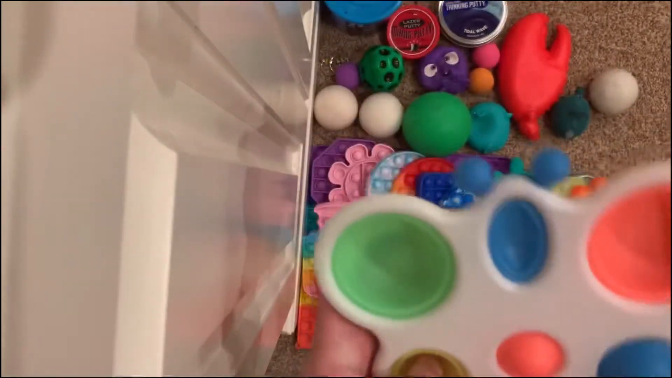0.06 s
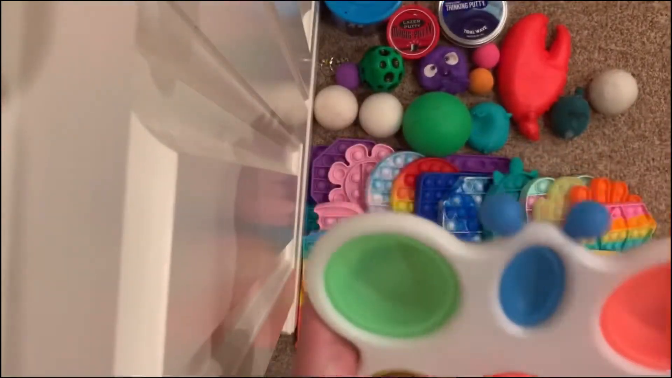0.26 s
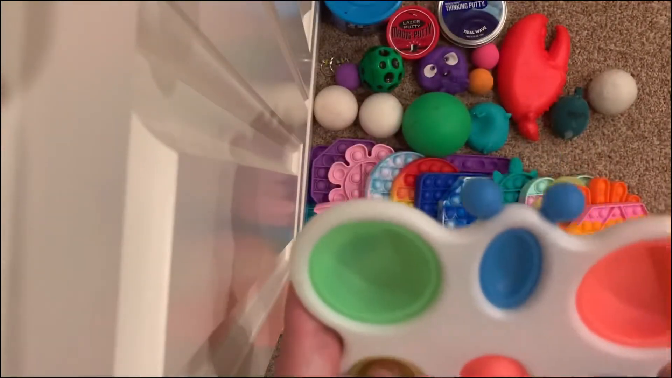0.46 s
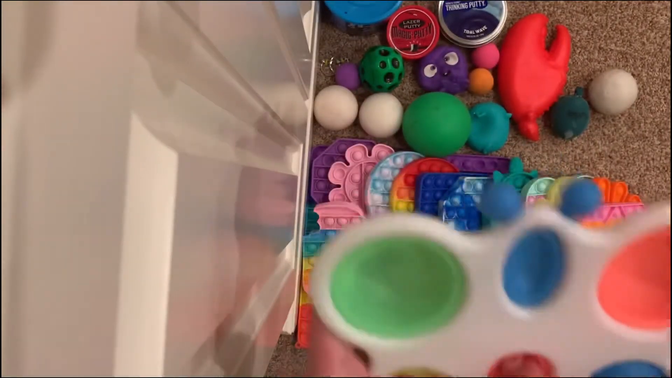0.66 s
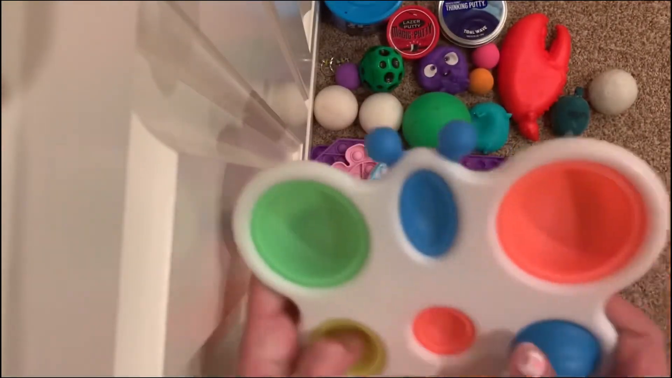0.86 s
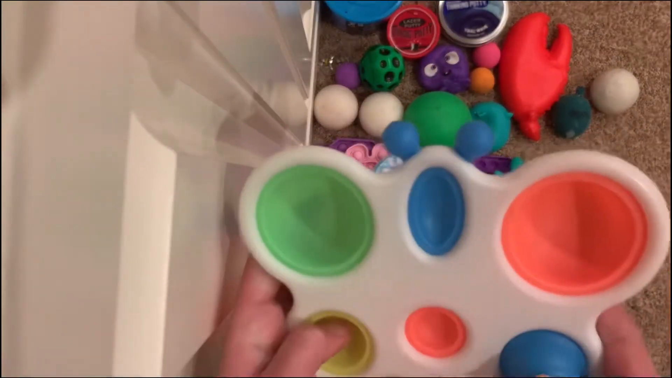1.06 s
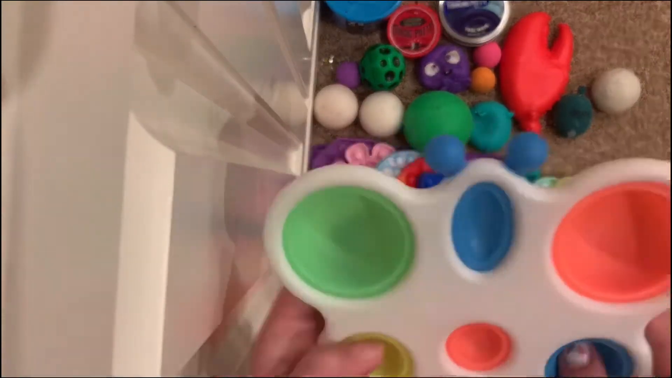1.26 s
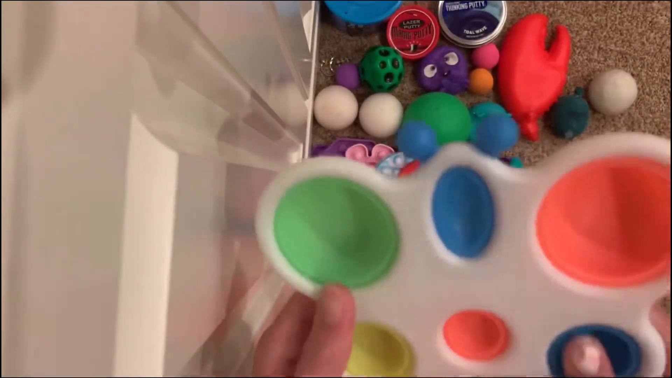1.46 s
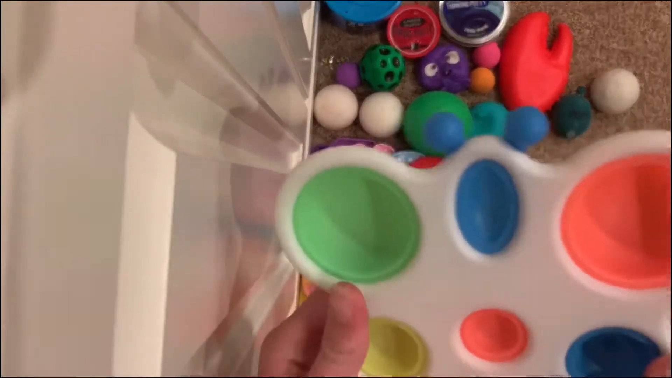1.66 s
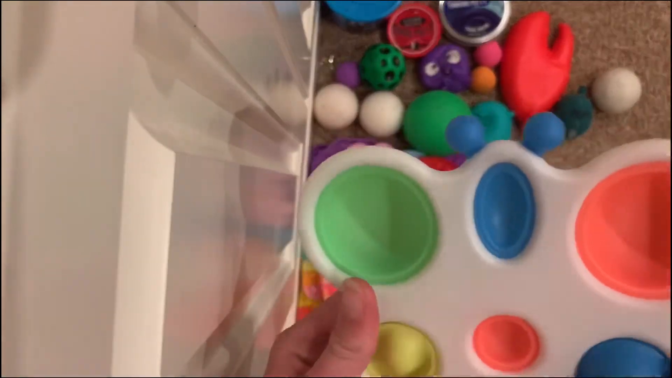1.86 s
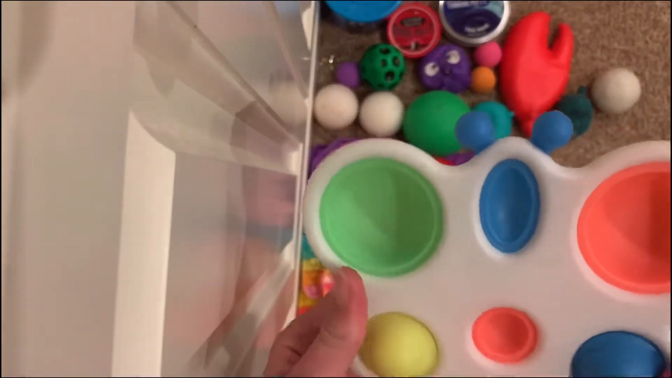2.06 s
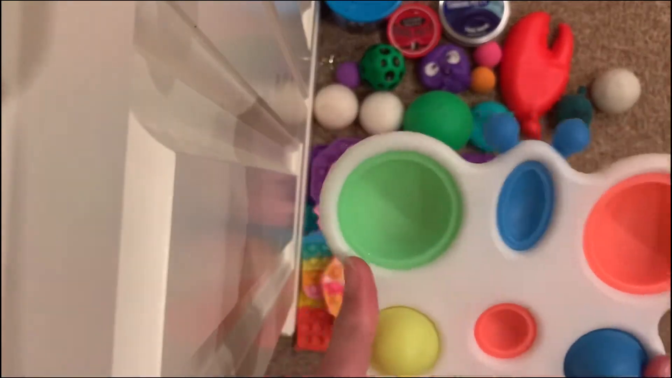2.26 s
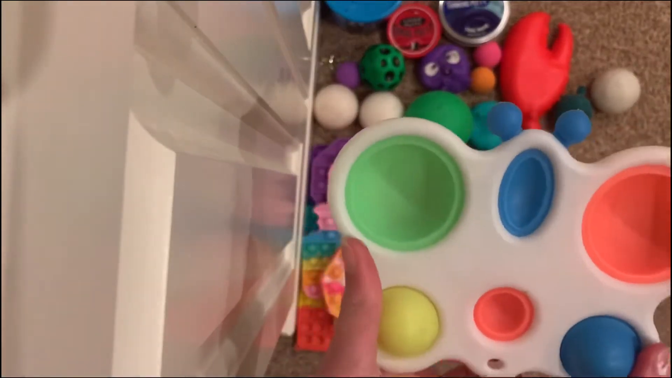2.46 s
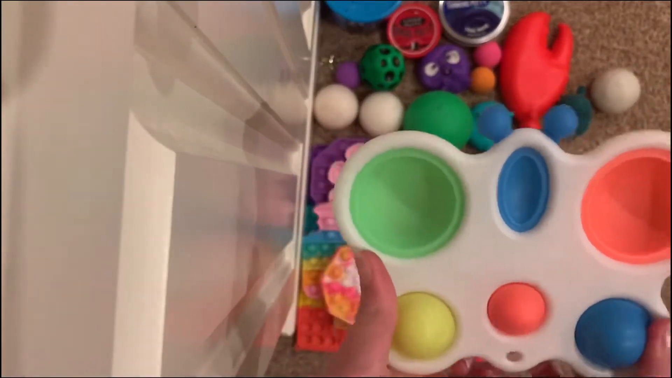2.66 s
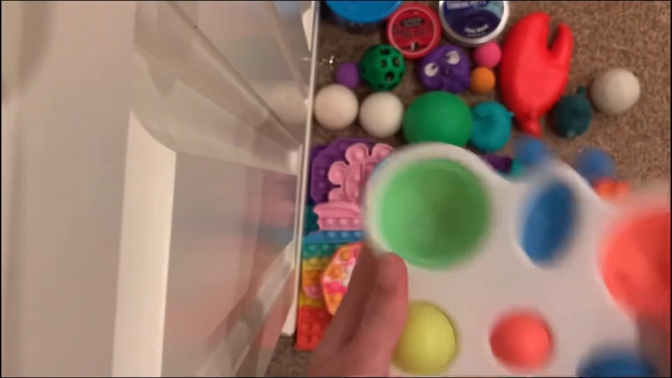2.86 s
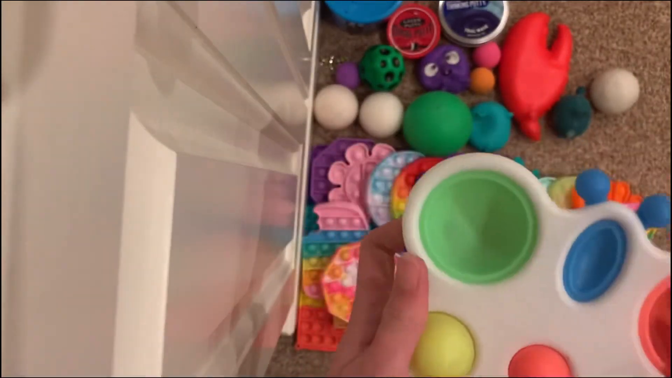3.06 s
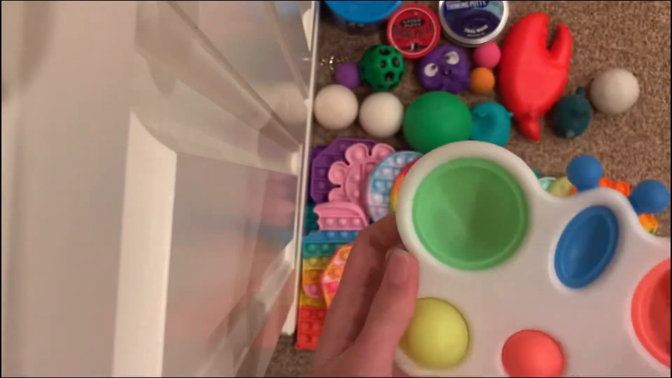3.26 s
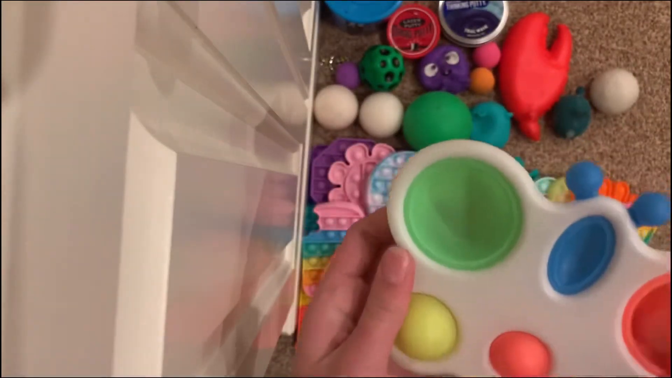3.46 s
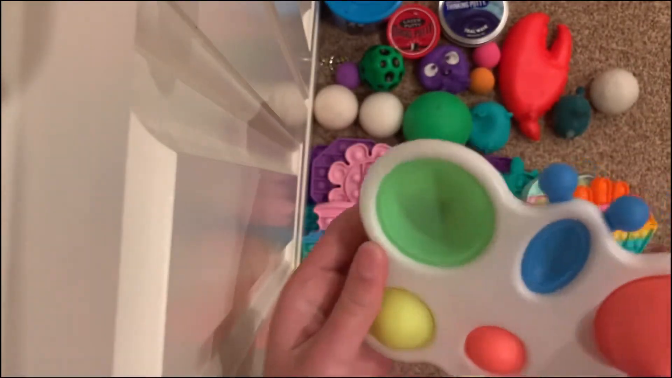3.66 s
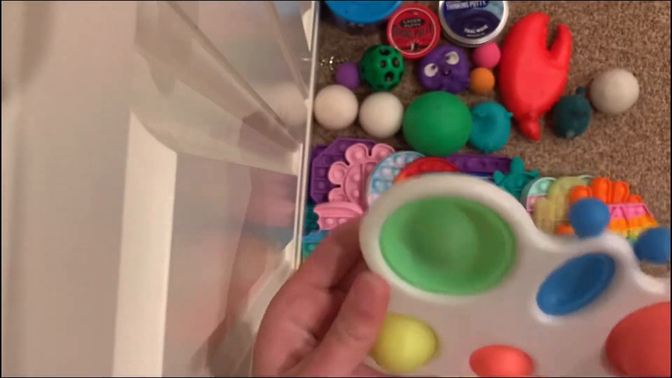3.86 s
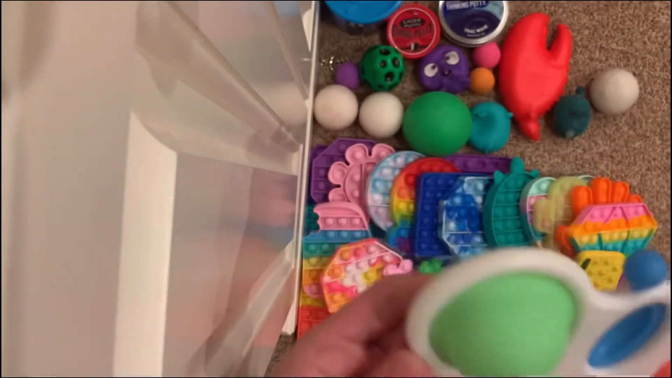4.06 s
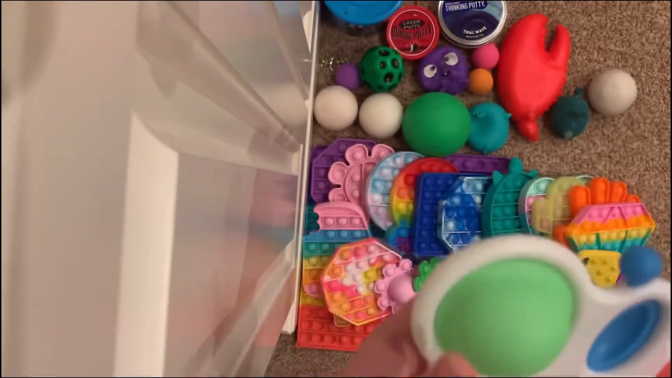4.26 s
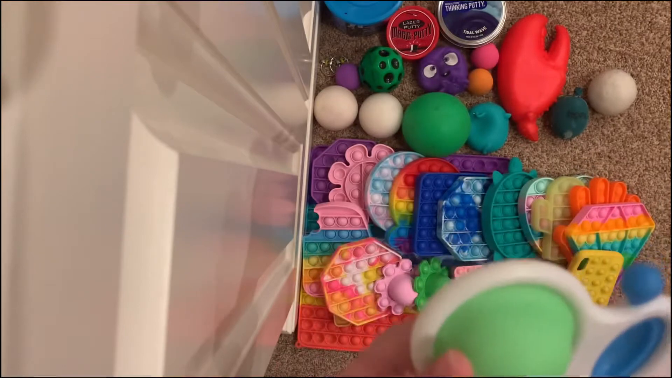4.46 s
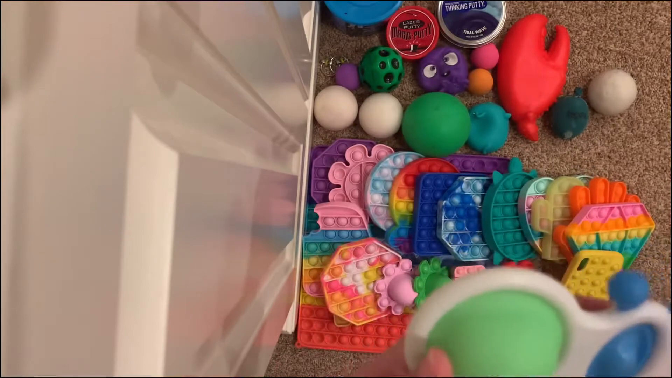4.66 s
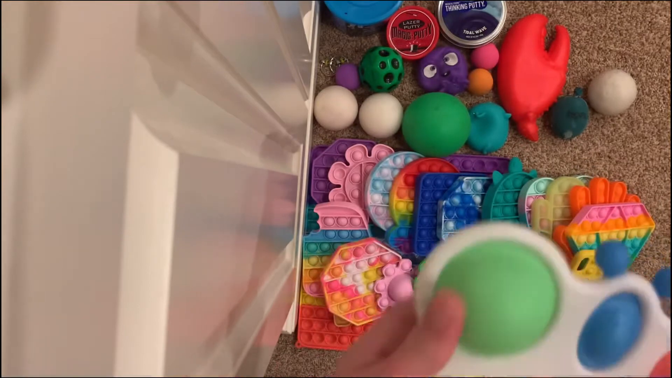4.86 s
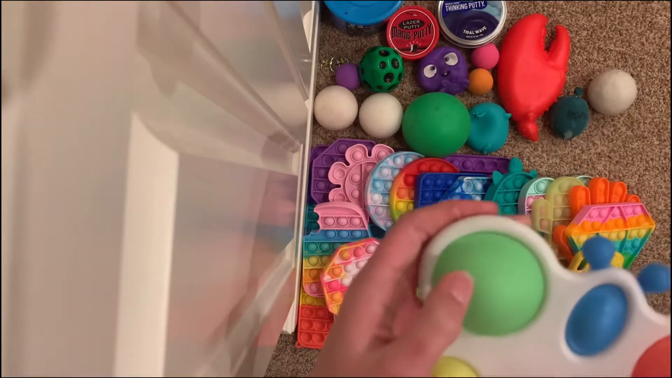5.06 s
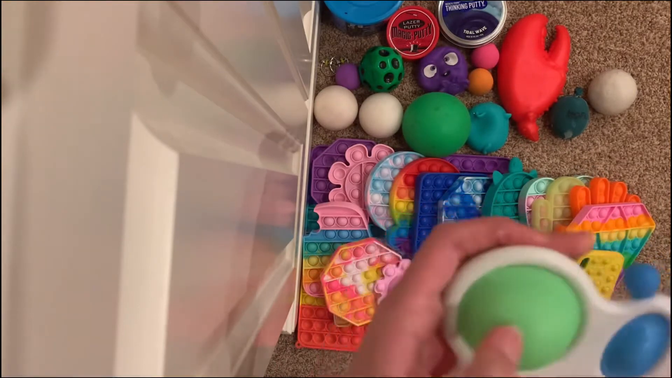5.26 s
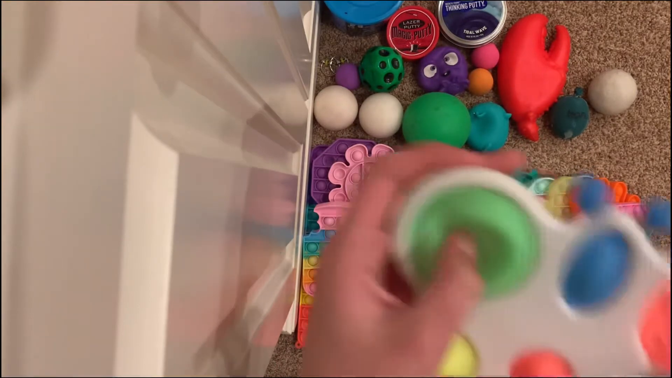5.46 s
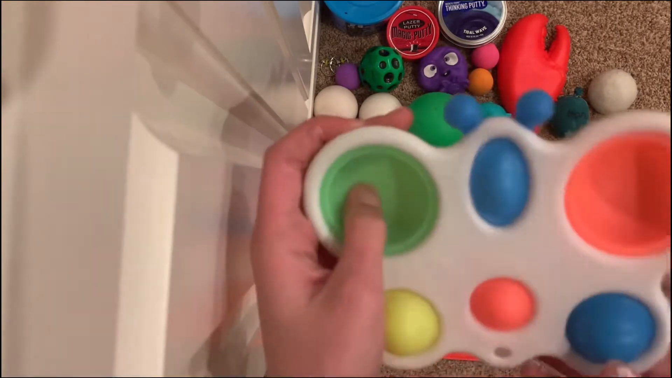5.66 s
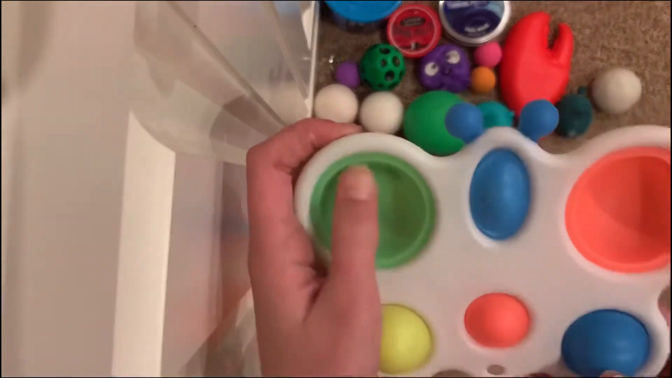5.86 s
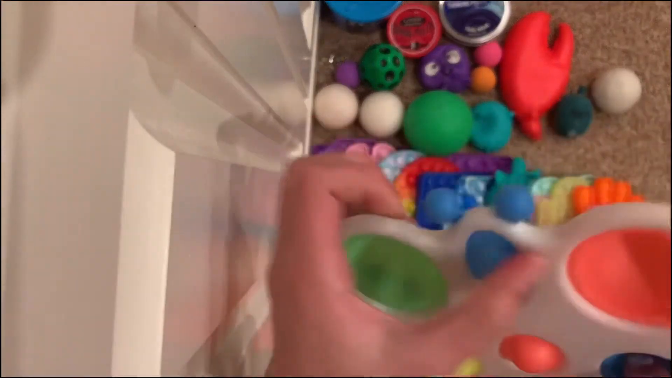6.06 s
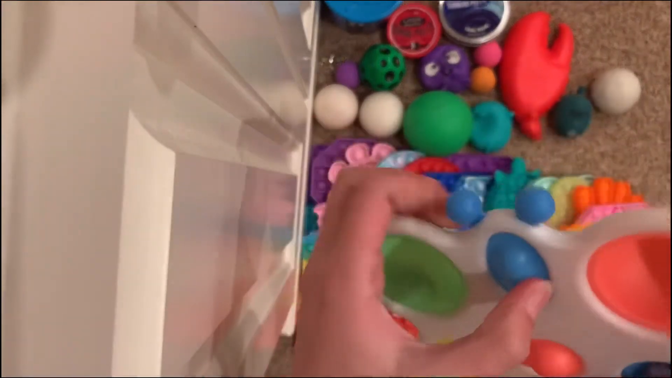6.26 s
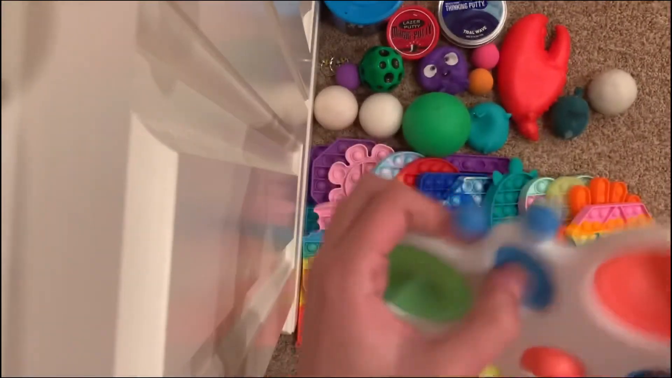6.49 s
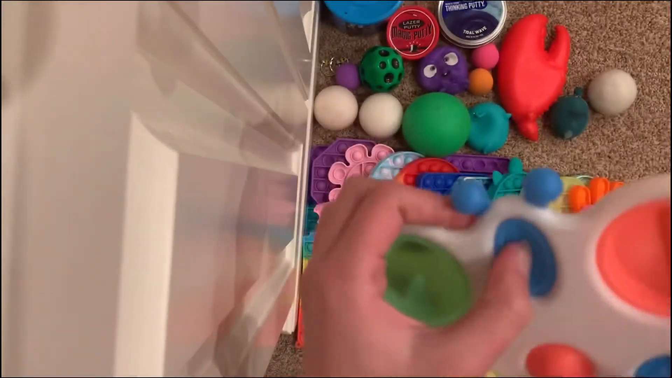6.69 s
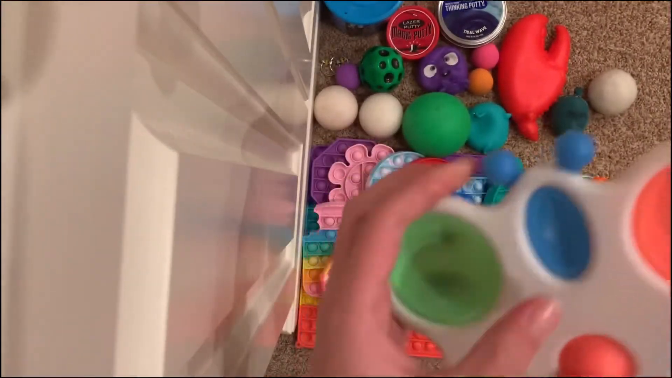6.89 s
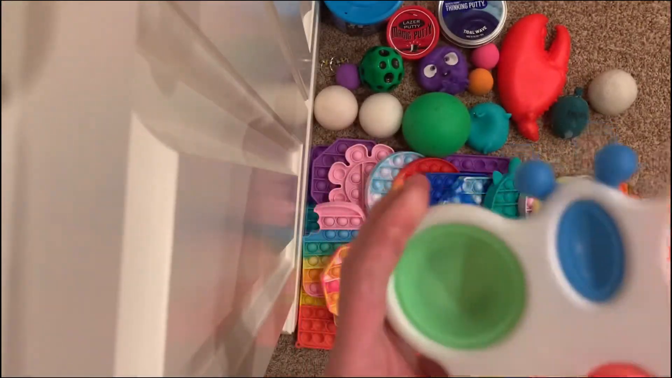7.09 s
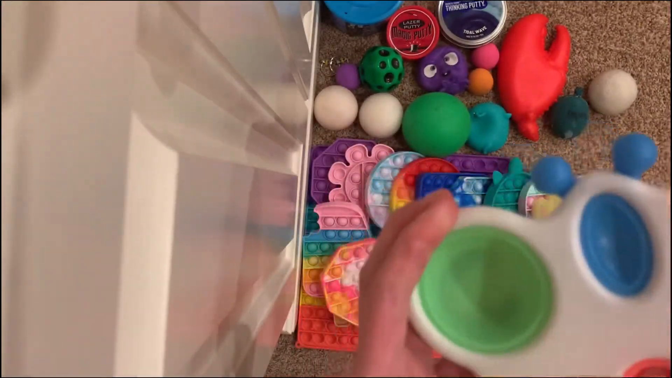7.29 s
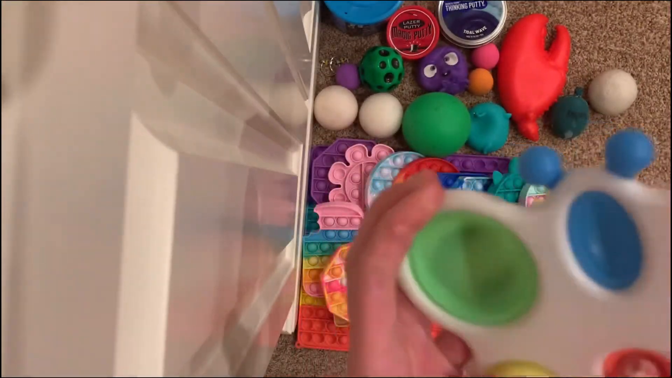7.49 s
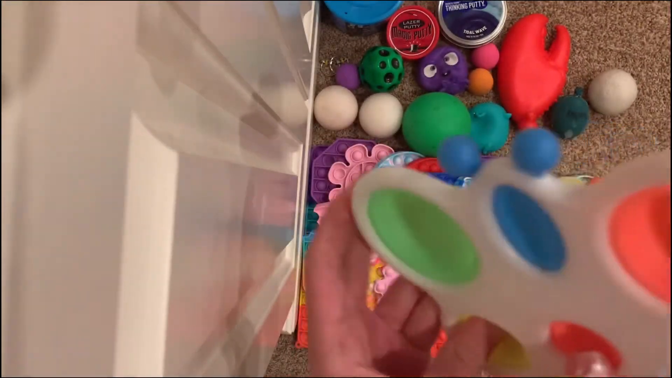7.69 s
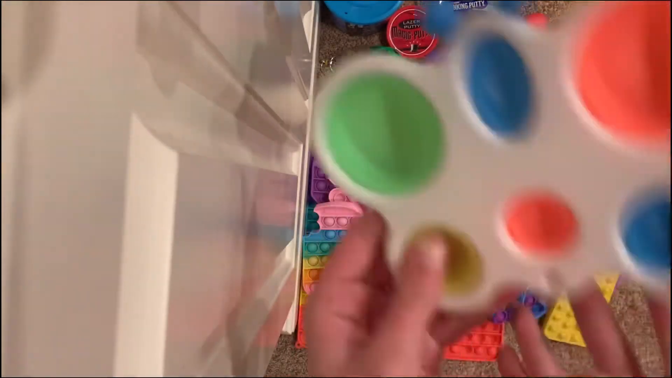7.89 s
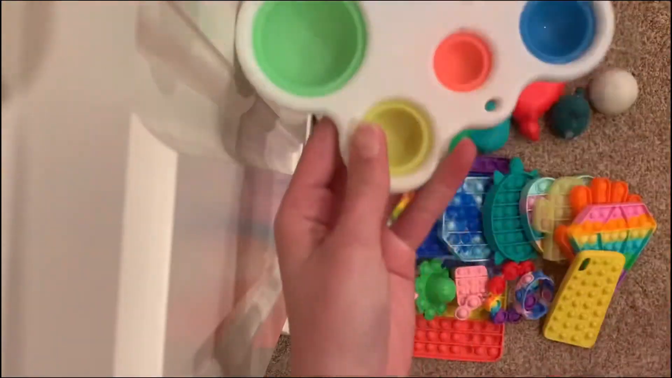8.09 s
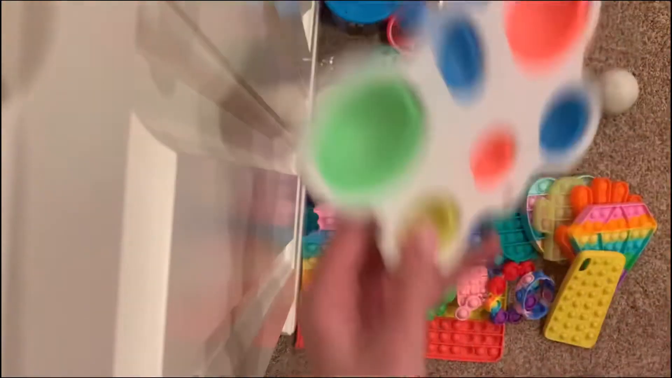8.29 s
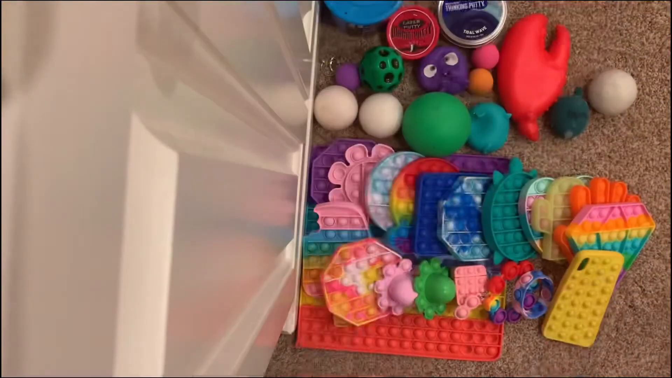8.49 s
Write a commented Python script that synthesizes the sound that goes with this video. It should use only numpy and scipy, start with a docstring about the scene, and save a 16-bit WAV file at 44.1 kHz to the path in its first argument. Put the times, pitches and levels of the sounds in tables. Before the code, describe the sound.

Rubbery silicone domes on a hand-held plastic toy pop one by one with hollow pocks and sharp cracks, between light finger taps and rubs.

```python
"""Silicone domes in a hand-held plastic frame are popped one by one, close to the microphone in a small room.
Each dome buckles and snaps through: short falling tones give a hollow pock, bursts of noise a crack and slap.
Between pops fingers tap (blips, knocks and ticks) and rub (hissing, scuffing noise with tiny slips).
Near the end something hollow gets a soft bump, made of fading low tones, a thump and noise.
Echoes and room sound surround it all; a low rumble and a faint hum lie underneath."""
import sys
import numpy as np
from scipy import signal
from scipy.fft import rfft, irfft, next_fast_len
from scipy.io import wavfile

SR = 44100
rng = np.random.default_rng(int(sys.argv[2]) if len(sys.argv) > 2 else 0)


def to_wav(sig):
    """Store sig (one row per channel, or 1-D mono) as 16-bit WAV at the path in sys.argv[1].

    Samples outside -1..1 are clipped; the rate is SR.
    """
    pcm = np.clip(np.atleast_2d(sig), -1, 1) * 32767
    pcm = np.round(pcm).astype(np.int16)
    wavfile.write(sys.argv[1], SR, pcm.T)  # frames by channels


N = 376173   # length of the scene in samples
AGE = np.arange(SR // 8) / SR   # time since a contact began, in s
ONSET_S = .00018   # how fast a hard contact grows

# domes snapping through: [t/s, dome level/dB, dome tone f/Hz, upper tone f/Hz, then levels above the dome:
# upper tone level/dB, air puff level/dB, frame level/dB, crack level/dB, slap level/dB; slap tilt/dB per octave]
POP_EVENTS = [(0.574, -29, 381, 1380, 10, -5, 0.5, 9, 4.5, -3),
              (1.202, -35.5, 332, 1170, -9.5, -10.5, -22.5, -3, -5.5, -0.5),
              (1.219, -23, 574, 1670, 0, -5.5, -19, -3.5, -4, 1),
              (1.786, -27, 522, 1615, 2.5, -8.5, -13.5, -16, -9, -3.5),
              (1.789, -18, 755, 1160, -3, -9, -27.5, -10, -25.5, 6),
              (1.89, -17.5, 592, 1153, 2.5, -39.5, -15, -11, -18, 4.5),
              (2.572, -20.5, 764, 1136, 4, -13.5, -24, -28.5, -21, 3),
              (3.524, -16, 580, 1188, -2, -13, -30.5, -12, -13, 4.5),
              (3.916, -30.5, 573, 1100, -10.5, -9, -33.5, -18, -24.5, 4),
              (3.959, -19.5, 372, 1224, -3.5, -6, -3.5, -1.5, -8, 12.5),
              (5.198, -27.5, 375.6, 1050, -4, -1.5, -17, -7, -5.5, 0.5),
              (5.212, -23, 370, 1176, 6, -4, -13, 3.5, -0.5, -5),
              (5.452, -25.5, 328, 1230, -14, -4.5, -14.5, -6.5, -4, 4),
              (5.507, -18, 337, 1714, -3, -6, -15, -6.5, -8.5, -3),
              (6.004, -35, 383, 1116, -15.5, -8.5, -15.5, -0.5, -7, -0.5),
              (6.015, -26, 492, 902, -8, -5, -34, -2, -1.5, 0),
              (6.481, -32.5, 352, 1400, 9.5, 4.5, 1.5, 9.5, 11.5, -4.5),
              (7.233, -27.5, 365.5, 1423, 9.5, -8, -18.5, 9, 2, -0.5),
              (7.583, -21, 502, 1110, -10.5, -10, -20, -6.5, -8.5, 0.5)]
# colour of the crack of a hard contact: [f/Hz, level/dB per Hz]
CRACK_COLOUR = [(500, 1), (1000, 7), (1900, -1.5), (2700, -9.5), (3600, -13.5), (4800, -7.5), (8000, -27)]
# colour of a knock on the toy: [f/Hz, level/dB per Hz]
KNOCK_COLOUR = [(300, -15.5), (700, -1.5), (1200, 1.5), (1800, -4.5), (2800, -14.5), (8000, -34)]
# colour of skin or nail on the toy: [f/Hz, level/dB per Hz]
SKIN_COLOUR = [(2500, -17), (4800, -0.5), (7200, 2), (8700, -0.5), (10000, -6.5), (13200, 1), (14500, -14),
               (16500, -18.5)]


def pops(flip_s=0.002, snap_s=0.002352, puff_octaves=0.73, dome_cycles=.9, upper_cycles=2.1, pan_db=-5):
    """A dome flips over with a slap, snaps home, puffs out air and sounds two falling tones and the frame."""
    puff_share = 0.35   # the puff's pitch as a share of the dome's
    dome_sag_octaves, upper_sag_octaves = 0.27, 0.45   # the pitch of both short tones falls as they fade
    lead_in_s, lead_in_db = .025, -19   # faint noise: time ahead of the pop, level above the upper tone
    out = np.zeros((2, N))
    for s, db, dome_hz, upper_hz, upper_db, puff_db, frame_db, crack_db, slap_db, tilt_db in POP_EVENTS:
        puff = at_level(thump(puff_share * dome_hz, snap_s, puff_octaves), db + puff_db)
        dome = at_level(pock(dome_hz, snap_s, dome_cycles, dome_sag_octaves), db)
        upper = at_level(pock(upper_hz, snap_s, upper_cycles, upper_sag_octaves), db + upper_db)
        frame = frame_ring(snap_s, db + frame_db)
        crack_shape = swell(flip_s, ONSET_S, fall_s=0.0046, hold_s=0.0032)
        crack = at_level(burst(CRACK_COLOUR, crack_shape), db + crack_db)
        slap = at_level(slap_noise(flip_s, tilt_db), db + slap_db)
        add(out, s, panned(puff + slap, 0) + panned(dome + upper + frame + crack, pan_db))
        # a faint knock-coloured noise swells just before each pop
        lead_in = burst(KNOCK_COLOUR, swell(lead_in_s, rise_s=.005, fall_s=.002))
        add(out, s - lead_in_s, panned(at_level(lead_in, db + upper_db + lead_in_db), pan_db))
    return out


def frame_ring(snap_s, db, t60_s=.007):
    """The snap jolts the plastic frame, and each of its modes rings briefly."""
    # modes of the plastic frame: [f/Hz, level/dB]
    frame_modes = [(1750, 2), (2150, -9.5), (2600, -17)]
    jolt = swell(snap_s, ONSET_S, fall_s=.001, hold_s=.001) * rng.standard_normal(len(AGE))
    out = np.zeros(len(AGE))
    for hz, mode_db in frame_modes:
        ring = resonate(resonate(jolt, hz, t60_s), hz, t60=.002)
        out += at_level(ring, db + mode_db)
    return out


def slap_noise(flip_s, tilt_db):
    """The slap of the flipping dome is a burst of treble, tilted brighter or duller for each pop."""
    # colour of the slap before tilting: [f/Hz, level/dB per Hz]
    slap_colour = [(2500, -33.5), (4000, 9), (5000, -2), (6200, 5), (7200, 7), (8700, 0.5), (10000, -0.5),
                   (13000, -0.5), (16000, -19)]
    tilted = [(hz, level + tilt_db * np.log2(hz)) for hz, level in slap_colour]
    return burst(tilted, swell(flip_s, ONSET_S, fall_s=.0015, hold_s=.0017))


def pock(hz, start_s, peak_cycles, sag_octaves):
    """A few cycles of a short tone: it swells for peak_cycles and dies while its pitch sags through hz."""
    x = np.maximum(AGE - start_s, 0) * hz / peak_cycles   # 1 where the swell peaks
    pitch = hz * 2 ** (sag_octaves * (1 - x) / (1 + x))
    phase = 2 * np.pi * np.cumsum(pitch * (x > 0)) / SR
    envelope = x ** 2 * np.exp(-2 * np.minimum(x, 20))
    return np.gradient(envelope * np.sin(phase))


def thump(hz, start_s, width_octaves, lag_cycles=1.0):
    """One soft push of air centred on hz: its lower part arrives later, so it swoops down."""
    f = np.fft.rfftfreq(len(AGE), 1 / SR) + 1
    size = np.exp(-.5 * (np.log2(f / hz) / width_octaves) ** 2) / np.sqrt(f)
    # each frequency arrives lag_cycles of its own cycles late
    cycles = f * start_s + lag_cycles * np.log(f / hz)
    return irfft(size * np.exp(-2j * np.pi * cycles), len(AGE))


def taps(lead_s=0.0016, pan_db=-3.5, width_octaves=.8, knock_db=-6.0, blip_db=-4.5):
    """A fingertip lands or lets go: a rubbery blip, a grainy knock near its pitch, and a tick of skin or nail."""
    # fingers landing or letting go; soft pads are low, nails high:
    # [t/s, strength level/dB, pitch f/Hz, tick level/dB]
    tap_events = [(0.001, -34.5, 1680, -49), (0.06, -42, 1580, -54), (0.249, -49.5, 1020, -56),
                  (0.373, -67.5, 1050, -85), (0.539, -55.5, 1395, -63.5), (0.788, -50, 1127, -54.5),
                  (1.151, -47.5, 1400, -60.5), (1.401, -48, 1000, -47.5), (1.436, -55.5, 1410, -74.5),
                  (1.684, -58.5, 570, -66), (1.834, -32, 446, -73.5), (2.1, -40.5, 1200, -49.5),
                  (2.202, -47.5, 1000, -63), (2.214, -51.5, 780, -76), (2.336, -62, 966, -84),
                  (2.429, -55.5, 1200, -73), (2.785, -54, 1780, -77), (2.889, -35, 1590, -40.5),
                  (3.026, -40.5, 980, -59.5), (3.242, -48, 1070, -53.5), (3.486, -58.5, 650, -69.5),
                  (4.14, -43, 690, -58), (4.294, -55.5, 700, -75), (4.66, -42.5, 229.7, -95),
                  (4.798, -50.5, 280, -75), (4.865, -54.5, 1210, -56.5), (4.992, -60, 1050, -79.5),
                  (5.485, -33, 1670, -39), (5.824, -51, 2000, -66.5), (5.86, -40.5, 1970, -61.5),
                  (6.478, -43, 900, -32.5), (6.786, -51, 1200, -63.5), (6.971, -47, 1050, -63),
                  (6.981, -51, 1100, -56.5), (7.038, -46.5, 490, -83.5), (7.059, -52.5, 870, -92),
                  (7.104, -51.5, 1130, -79), (7.456, -47, 900, -50), (7.544, -44, 980, -69),
                  (7.568, -70, 1000, -47), (7.74, -40.5, 1050, -51.5), (7.783, -47.5, 760, -56),
                  (7.983, -35.5, 1730, -43), (8.475, -35.5, 1037, -57), (8.513, -35, 383, -54)]
    knock_centre_hz = 1120   # the knock colour belongs to a touch of this pitch
    out = np.zeros(N)
    for s, db, hz, tick_db in tap_events:
        blip = at_level(thump(hz, lead_s, width_octaves), db + blip_db)
        stretch = min(hz / knock_centre_hz, 1.15)
        knock_colour = [(knock_hz * stretch, level) for knock_hz, level in KNOCK_COLOUR]
        knock = burst(knock_colour, swell(lead_s, rise_s=0.0005, fall_s=0.009))
        tick = burst(SKIN_COLOUR, swell(lead_s, rise_s=0.0004, fall_s=.003))
        add(out, s, blip + at_level(knock, db + knock_db) + at_level(tick, tick_db))
    return panned(out, pan_db)


def rubs(drag_db=-3, slip_db=-4.5, catch_db=3.2, pan_db=-1.0):
    """Skin drags at each change of grip and after each pop: it hisses, scuffs in fits and slips in small jerks."""
    # fingers shifting their grip: [start t/s, length t/s, scuff level/dB, hiss level/dB]
    grip_shifts = [(0.0, 0.069, -45.5, -61), (.19, 0.059, -64, -61), (0.7, 0.12, -58, -65),
                   (0.955, 0.044, -68, -90), (1.3, 0.14, -63, -63), (2.648, 0.2, -76, -66),
                   (2.885, 0.084, -48, -60), (3.015, 0.028, -39.5, -59.5), (3.04, 0.15, -57.5, -68),
                   (4.777, 0.15, -68.5, -70), (5.055, 0.06, -68.5, -96.5), (5.905, 0.03, -59, -67),
                   (6.6, 0.6, -67.5, -70), (7.487, 0.077, -54.5, -60.5), (7.704, 0.15, -63.5, -60.5),
                   (7.96, 0.07, -44, -58), (8.434, 0.16, -52.5, -57.5)]
    # colour of the scuffing: [f/Hz, level/dB per Hz]
    scuff_colour = [(70, 3.5), (300, 5.5), (1200, -4), (2100, -6), (3200, -11.5), (8000, -24.5)]
    # after each pop the thumb slides off: delay, length, then scuff and hiss relative to the slap
    slide_wait_s, slide_s, slide_db, slide_hiss_db = 0.11, 0.22, -50.5, -48
    # a stroke swells over this share of its length, and fades after it
    rise_share, release_s = .45, .022
    slides = []
    for s, db, *_, slap_db, _ in POP_EVENTS:
        slides.append((s + slide_wait_s, slide_s, db + slap_db + slide_db, db + slap_db + slide_hiss_db))
    scuff_power, hiss_power = np.zeros((2, N))
    t = np.arange(SR) / SR
    for s, length, db, hiss_db in list(grip_shifts) + slides:
        rise = np.minimum(t / (rise_share * length), 1)
        stroke = rise * np.exp(-np.maximum(t - length, 0) / release_s)
        add(scuff_power, s, (from_db(db) * stroke) ** 2)
        add(hiss_power, s, (from_db(hiss_db) * stroke) ** 2)
    grip = from_db(catch_db * np.minimum(wander(25), 2))   # uneven loudness
    drag = from_db(drag_db) * colour(rng.standard_normal(N), scuff_colour)
    body = (drag + from_db(slip_db) * slips()) * grip
    skin = colour(rng.standard_normal(N), SKIN_COLOUR) * grip
    return panned(np.sqrt(scuff_power) * body + np.sqrt(hiss_power) * skin, pan_db)


def slips(per_s=110, range_db=20, low_hz=780, high_hz=1650, peak_cycles=1.2, sag_octaves=0.23):
    """Skin sticks and lets go at uneven moments, each slip a blip of its own pitch and size; rms 1."""
    out = np.zeros(N)
    for k, (when, pitch, size) in enumerate(rng.random((int(per_s * N / SR), 3))):
        blip = pock(low_hz * (high_hz / low_hz) ** pitch, 0, peak_cycles, sag_octaves)
        add(out, (k + 2 * when) / per_s, at_level(blip, range_db * size))
    return out / np.std(out)


def bump(start_s=8.039, contact_s=0.00813, click_db=-34, thump_hz=90, thump_db=-28, boom_db=-20):
    """A soft blow thumps, clicks and sets the low modes of a hollow body ringing."""
    # modes of the hollow body: [f/Hz, level/dB, time to fall 60 dB t/s]
    body_modes = [(70.3, -38, 1), (167.4, -18.5, 0.18), (261, -35.5, 0.34), (446, -25, 0.32),
                  (492, -11, 0.056)]
    # colour of its many close low modes: [f/Hz, level/dB per Hz]
    boom_colour = [(230, 10), (400, 1), (800, -40.5)]
    t = np.arange(SR // 2) / SR
    ring = np.zeros(len(t))
    for k, (hz, db, t60) in enumerate(body_modes):
        sign = (-1) ** k   # every other mode starts the opposite way
        ring += sign * from_db(db - 60 * t / t60) * np.sin(2 * np.pi * hz * t)
    click = burst(CRACK_COLOUR, swell(0, ONSET_S, fall_s=0.015))
    boom = burst(boom_colour, swell(contact_s, contact_s / 2, fall_s=0.036))
    out = np.zeros(N)
    add(out, start_s, ring * (1 - np.exp(-t / contact_s)))
    add(out, start_s, at_level(click, click_db))
    add(out, start_s, at_level(thump(thump_hz, contact_s, 0.73), thump_db))
    add(out, start_s, at_level(boom, boom_db))
    return panned(out, -2.6)


def near_echoes(x, dull_hz=5000):
    """Surfaces within arm's reach throw back dull copies."""
    # echoes: [delay t/s, level/dB]
    echo_list = [(.0021, -22), (.0037, -23), (.0046, -21.5)]
    dull = signal.sosfilt(signal.butter(1, dull_hz, fs=SR, output="sos"), x)
    out = np.zeros((2, N))
    for s, db in echo_list:
        add(out, s, from_db(db) * dull)
    return out


def room(x, build_s=0.00043, side_share=0.82, cluster_s=.011, cluster_db=3.0):
    """Reflections arrive as noise in uneven clusters and die away at a different speed in each band."""
    # strength of the reflections: [f/Hz, level/dB]
    room_levels = [(100, -15.5), (300, -22.5), (600, -18), (1200, -21.5), (2000, -18.5), (2900, -12.5),
                   (6000, -21), (13000, -22)]
    # time the room takes to fall by 60 dB: [f/Hz, t/s]
    room_decay = [(100, .35), (600, .47), (2500, .45), (4500, .39), (13000, .3)]
    t = np.arange(2 * SR // 3) / SR
    white, response = rng.standard_normal((2, 2, len(t))), 0
    edges = np.geomspace(70, 14500, 21)
    cluster_times = np.arange(0, 1, cluster_s)
    shared = rng.standard_normal(len(cluster_times))   # unevenness common to all bands
    for k, (low, high) in enumerate(zip(edges, edges[1:])):
        hz = np.sqrt(low * high)
        band = signal.butter(2, [low, high], "band", fs=SR, output="sos")
        decay = from_db(-60 * t / at_hz(room_decay, hz)) * np.sqrt(1 - np.exp(-t / build_s))
        uneven = shared + rng.standard_normal(len(cluster_times))
        decay = decay * from_db(cluster_db * np.interp(t, cluster_times, uneven))
        mid, side = signal.sosfilt(band, white[k % 2] * decay / np.linalg.norm(decay))
        response = response + from_db(at_hz(room_levels, hz)) * (mid + side_share * side * [[1], [-1]])
    return signal.fftconvolve(x.mean(axis=0)[None], response, axes=1)[:, :N]


def ambience(own_share=0.1, air_db=-56.5, hum_hz=120.9, hum_db=-58.5):
    """Low rumble, nearly the same on both sides, and a wavering hum somewhere in the house."""
    # colour of the rumble: [f/Hz, level/dB per Hz]
    air_colour = [(20, -14), (42, -6.5), (60, 14.5), (80, 5), (165, -3), (260, -20), (520, -31),
                  (1100, -32), (2500, -41.5), (13000, -40), (16000, -61.5)]
    air = colour(rng.standard_normal(N) + own_share * rng.standard_normal((2, N)), air_colour)
    t = np.arange(N) / SR
    hum = from_db(hum_db + 3 * wander(4)) * np.sqrt(2) * np.sin(2 * np.pi * hum_hz * t)
    return from_db(air_db) * air + hum


def wander(rate_hz):
    """Smooth chance that changes about rate_hz times a second; spread 1."""
    return colour(rng.standard_normal(N), [(rate_hz, 0), (6 * rate_hz, -40), (18 * rate_hz, -110)])


def swell(start_s, rise_s, fall_s, hold_s=0):
    """Grows exponentially up to start_s, holds, and then dies away."""
    rise = (AGE - start_s) / rise_s
    fall = (start_s + hold_s - AGE) / fall_s
    return np.exp(np.clip(np.minimum(rise, fall), -40, 0))


def burst(spectrum, envelope):
    """A short coloured noise under an envelope."""
    return colour(rng.standard_normal(len(AGE)), spectrum) * envelope


def colour(x, spectrum):
    """Gives noise a spectrum; rms 1."""
    size = next_fast_len(x.shape[-1])
    gain = from_db(at_hz(spectrum, np.fft.rfftfreq(size, 1 / SR)))
    y = irfft(rfft(x, size) * gain, size)[..., :x.shape[-1]]
    return y / np.std(y)


def resonate(x, hz, t60):
    """A two-pole resonance that passes no steady pressure."""
    r = from_db(-60 / (t60 * SR))
    return signal.lfilter([1, 0, -1], [1, -2 * r * np.cos(2 * np.pi * hz / SR), r * r], x + 1e-18)


def at_level(x, db, span_s=0.011):
    """Scales a short sound to the energy of that rms level held for span_s."""
    return x * from_db(db) * np.sqrt(span_s * SR / np.sum(x ** 2))


def from_db(db):
    """Decibels to gain."""
    return 10 ** (np.asarray(db) / 20)


def at_hz(points, hz):
    """Reads a table on a log-frequency axis."""
    table = np.array(points)
    return np.interp(np.log(hz + 1), np.log(table[:, 0]), table[:, 1])


def add(out, s, sound):
    """Mixes a sound in at time s."""
    i = int(np.clip(round(s * SR), 0, N))
    out[..., i:i + sound.shape[-1]] += sound[..., :N - i]


def panned(x, db):
    """Mono to stereo; db is the left level minus the right."""
    return x * from_db([[db / 2], [-db / 2]])


def delayed(x, s):
    """Delays by any fraction of a sample."""
    size = next_fast_len(N + SR // 8)
    turn = np.exp(-2j * np.pi * np.fft.rfftfreq(size, 1 / SR) * s)
    return irfft(rfft(x, size) * turn, size)[:N]


def scene(handling_room_db=7.5):
    """The toy close by, its echoes, the room and the quiet of the house."""
    handling = taps() + rubs()
    toy = pops() + handling + bump()
    # the far side of the toy sends its own sound to the walls
    far_face = pops() + from_db(handling_room_db) * handling
    reverb = (room(toy) + room(far_face)) / np.sqrt(2)
    return toy + near_echoes(toy) + reverb + ambience()


def record(dry, turn_hz=640, lag_s=.000204, notch_hz=950, notch_q=16, low_cut_hz=51, cutoff_hz=16600):
    """The left port turns the phase of the treble and the right one lags; notch, low cut, rounded peaks, top cut."""
    turn = np.exp(-2 * np.pi * turn_hz / SR)
    left = signal.lfilter([-turn, 1], [1, -turn], dry[0])
    ports = np.array([left, delayed(dry[1], lag_s)])
    # a narrow dip from the microphone housing
    ports = signal.lfilter(*signal.iirnotch(notch_hz, notch_q, fs=SR), ports)
    ports = signal.sosfilt(signal.butter(4, low_cut_hz, "high", fs=SR, output="sos"), ports)
    rounded = ports / (1 + (ports / .93) ** 6) ** (1 / 6)
    return signal.sosfilt(signal.ellip(10, .2, 80, cutoff_hz, fs=SR, output="sos"), rounded)


dry = scene()
out = record(dry)
to_wav(out)
```